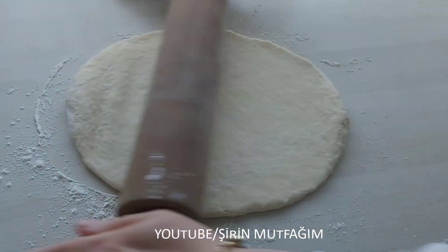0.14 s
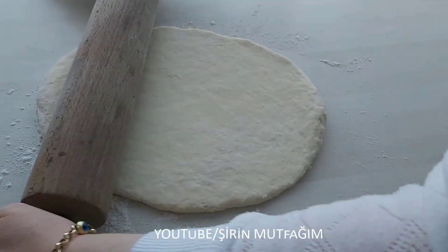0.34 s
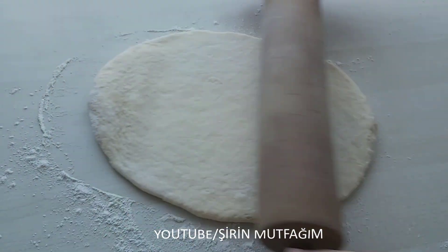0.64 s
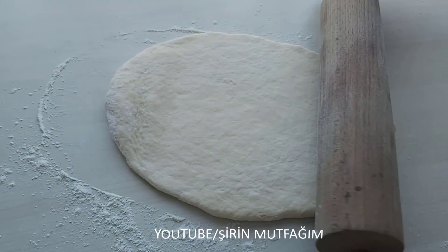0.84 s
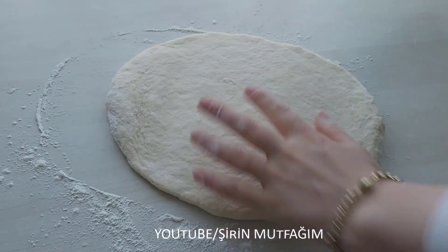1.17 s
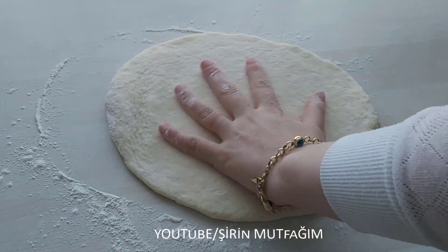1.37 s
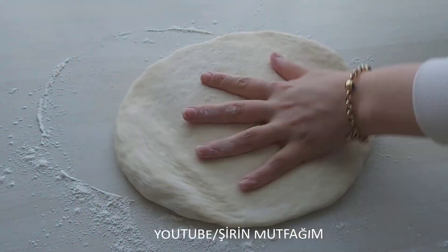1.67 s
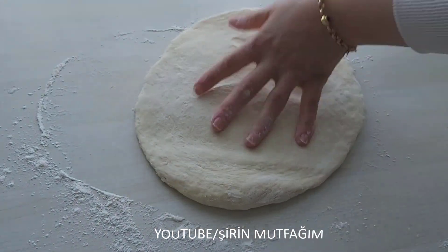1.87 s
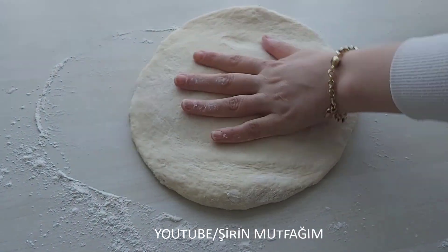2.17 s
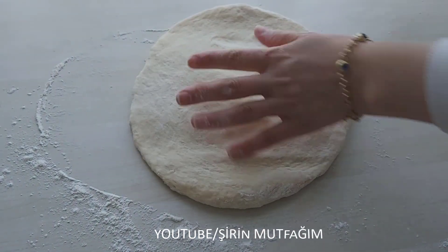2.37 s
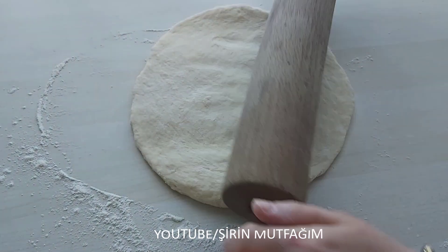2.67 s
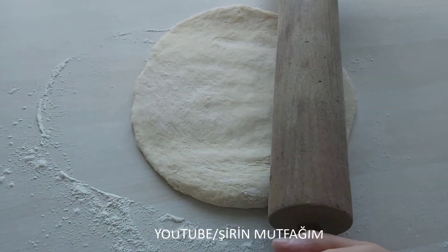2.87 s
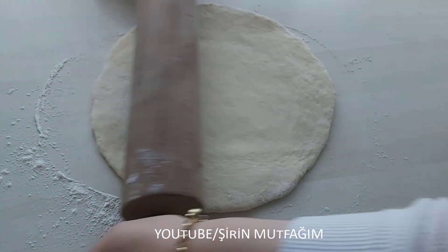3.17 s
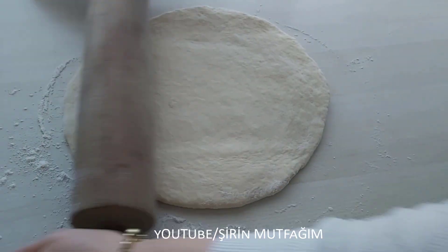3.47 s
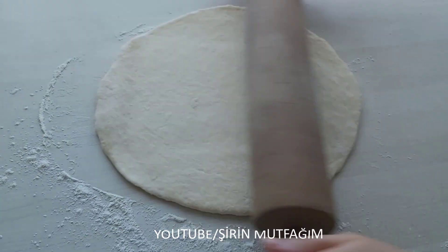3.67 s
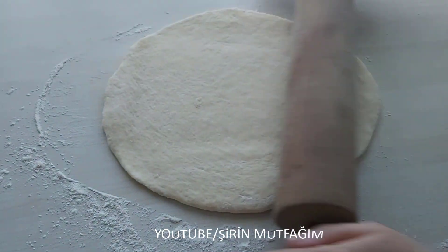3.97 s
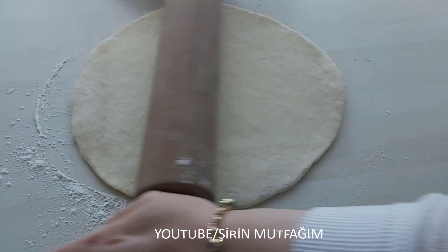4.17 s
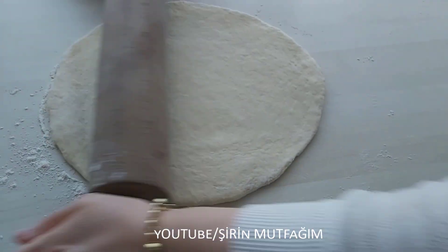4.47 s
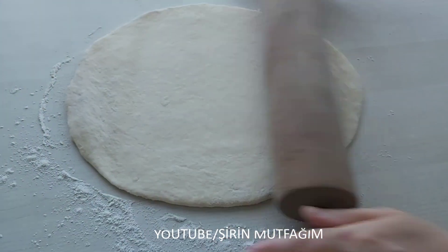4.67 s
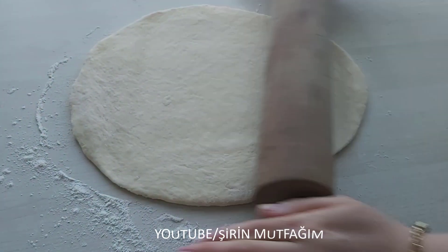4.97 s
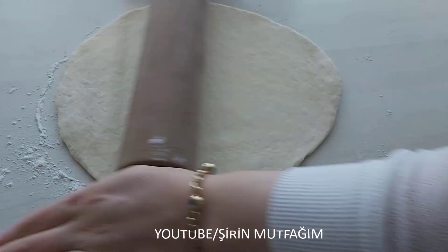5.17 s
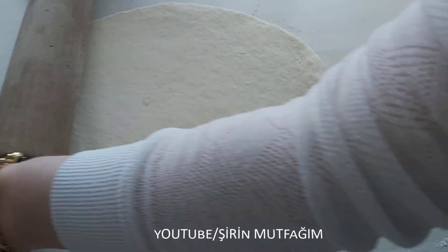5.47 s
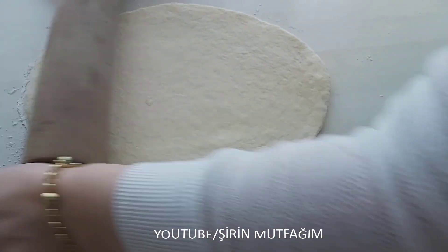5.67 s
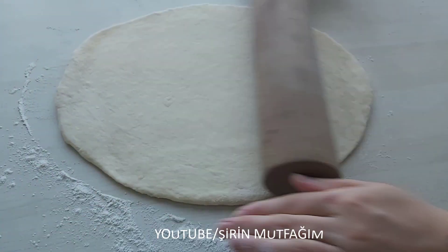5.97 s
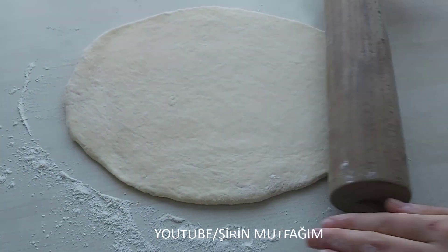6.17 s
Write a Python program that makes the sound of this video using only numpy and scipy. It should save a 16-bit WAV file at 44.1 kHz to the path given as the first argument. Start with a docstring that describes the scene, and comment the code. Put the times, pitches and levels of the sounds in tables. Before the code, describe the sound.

A wooden rolling pin rolls over floured dough in a ringing kitchen, rumbling, hissing and clicking, interrupted by hand pats and a swishing slide.

```python
"""A wooden rolling pin with loose handles works floured dough on a table in a bare, ringing kitchen.
Over a steady hum, the first strokes bring flour hiss, dough rasp, table rumble and axle rub: friction noise that
follows speed. Axle clicks, dull bumps, handle knocks, thumps and groans join them: blows and slips that excite
resonances. Then a hand pats the dough and slides it round with a swish. Rolling starts again with a thin squeak;
scuffs, knocks and the barrel's bumps over lumps of dough punctuate the later strokes."""
import sys
import numpy as np
from scipy import signal
from scipy.fft import rfft, irfft
from scipy.io import wavfile
from scipy.ndimage import uniform_filter1d

SR = 44100
rng = np.random.default_rng(int(sys.argv[2]) if len(sys.argv) > 2 else 0)


def waveform_to_disk(signal):
    """Save audio, clipped to [-1, 1], as 16-bit WAV at the path in sys.argv[1]."""
    frames = np.transpose(np.atleast_2d(signal))
    scaled = np.clip(frames, -1, 1) * 32767
    samples = np.round(scaled).astype(np.int16)
    wavfile.write(sys.argv[1], SR, samples)


N = 279285

# All source levels are relative: each layer's own gain is added to them.
# hum in the quiet of the kitchen: [f/Hz, width/Hz, lift/dB]; broad colour of the quiet: [f/Hz, density/dB]
HUM = [(70, 5.1, 5), (228, 10, 11), (239.8, 5.2, 29.5), (418, 27, 6)]
FLOOR_COLOUR = [(25, 12), (70, 12), (130, 8), (260, 6.5), (500, 2), (1200, -12.5), (5000, -23), (8000, -16),
                (11500, -15.5), (15000, -31)]
# strokes of the pin, out or back: [t/s, length/s, share of length at which it is fastest,
# flour hiss level/dB, dough rasp level/dB, table rumble level/dB, axle rub level/dB]
STROKES = [(-.03, 0.48, 0.28, -53.5, -56.5, -53, -64.5), (0.443, 0.4, 0.38, -52.5, -54, -58.5, -61.5),
           (0.833, .11, 0.64, -50, -62.5, -61, -60.5), (2.708, 0.27, 0.25, -60, -77, -64, -68),
           (2.997, 0.51, 0.06, -55.5, -60, -53, -64), (3.506, 0.38, 0.52, -50, -56, -49, -59),
           (3.931, 0.65, 0.14, -54.5, -59, -58.5, -64), (4.502, 0.35, 0.25, -51, -55, -48, -60),
           (4.88, 0.6, 0.41, -57.5, -66, -58, -64.5), (5.689, .51, 0.23, -51, -56.5, -52, -60.5),
           (6.224, 0.31, .3, -56.5, -87, -59.5, -71)]
# hand brushing or pushing the dough round on flour: [t/s, length/s, flour hiss level/dB, swish level/dB]
SLIDES = [(1.335, 0.051, -57, -88), (1.38, 0.57, -46, -48.5), (1.93, 0.01, -58, -62), (2.1, .22, -55, -60),
          (2.35, 0.061, -62.5, -79), (2.62, 0.044, -65, -90)]
# axle clicks, and a few dull bumps of the pin on the table:
# [t/s, level/dB, rebound rel. to it/dB, table thud rel. to it/dB]
CLICKS_AND_BUMPS = [(.168, -65.5, -3.5, 26), (.195, -45.5, -8, -2), (.895, -49.5, 2, -3),
                    (1.085, -49.5, 3, -1), (1.222, -103, -1, 22), (4.701, -45.5, -11, -2.5),
                    (4.735, -49, -12, 7.5), (6.037, -44.5, .8, -0.5)]
# a handle knocking against the barrel: [t/s, level/dB, rebound rel. to it/dB, table thud rel. to it/dB]
KNOCKS = [(.418, -45, 3, 6.5), (.450, -46, -12, 11.5), (3.300, -34, -2.5, 2), (4.295, -53, 7, 2.5),
          (4.394, -42, -0.5, 4.5), (5.460, -38, 0.1, 8.5), (5.569, -34, -3, 11.5), (5.606, -37.5, -4, 0)]
# hand or barrel landing on the table, or the barrel bumping over lumps of dough:
# [t/s, push level/dB, time of greatest push/s, slap rel. to push/dB, lowest modes rel. to push/dB]
THUMPS = [(.515, -21, 0.00082, 14, 2), (1.341, -1, 0.0029, -18.5, -4.5), (1.408, -12.5, 0.0011, -13, -8),
          (2.093, 5, 0.0039, -18.5, -22), (2.112, 6, 0.0019, -14, -0.5), (3.116, -4, 0.0026, -33, 3.5),
          (3.477, -14, 0.00073, 3, 4), (3.837, 6.5, 0.00047, 4.5, -12), (3.888, -30, 0.00078, 27, 25),
          (4.476, -32.5, 0.00034, 25.5, -3), (4.52, -32, 0.00051, 27, -9), (4.569, -14, 0.002, -12, 9),
          (5.065, -29, 0.00042, 19, 1), (5.579, -3, 0.00086, -26, 0.5)]
# the dry axle catching and groaning: [t/s, length/s, low ring level/dB, high ring level/dB]
GROANS = [(.84, .07, -60, -57), (.915, 0.015, -54, -74), (2.636, .03, -67, -64), (2.745, 0.21, -65, -79),
          (3.045, 0.074, -53.5, -54.5), (4.9, 0.13, -69, -72), (5.18, 0.045, -56, -61),
          (6.268, 0.049, -60, -65)]
# thin axle squeak as rolling starts again: [t/s, length/s, level/dB]
SQUEAK = [(2.82, 0.15, -62.5)]
# the barrel scuffing as it bites into the dough: [t/s, level/dB, table thud rel. to it/dB]
SCUFFS = [(3.065, -47.5, -33), (3.976, -39.5, 2.5)]

# low modes of table and kitchen: [f/Hz, level/dB, t60/s]
TABLE_MODES = [(46.5, -49, 0.48), (71.4, -46, 2.13), (85.2, -39.5, 0.5), (130.7, -27.5, 0.56),
               (144.4, -42, 0.26), (171.2, -40.5, 0.52), (209.8, -44.5, 0.99), (254, -39.5, 0.96),
               (285.4, -41, 0.45), (402, -39.5, 0.8), (542, -38, 0.45)]
# resonances of table top, pin, axle, and rubbed barrel (bright, hollow): [f/Hz, width/Hz, lift/dB]
BOARD = [(130.5, 8.6, 17), (209.7, 32, 11.5), (286, 40, 12), (399, 130, 6.5)]
PIN = [(822, 440, 7.5), (1747, 27, 10.5), (1980, 70, 2), (1940, 40, -1.5), (2285, 65, 12), (2540, 56, 11),
       (2876, 44, 17), (3150, 196, 15.5), (3350, 13, 10), (3790, 80, 12.5), (5040, 320, 5),
       (6210, 240, 8.5), (7700, 230, 8.5), (8280, 58, 16), (10000, 250, 12.5), (11500, 640, 2)]
SPINDLE = [(2390, 160, 11.5), (3160, 91, 10), (3610, 29, 14), (4610, 540, 6.5), (6770, 200, 0),
           (8630, 170, 6), (9600, 180, -12), (10100, 62, -39)]
BRIGHT = [(2340, 800, 20.5)]
HOLLOW = [(377, 220, 11.5), (1140, 390, 16)]

# broad spectral shapes of the rubbed and rolled layers: [f/Hz, density/dB]
HISS_COLOUR = [(500, -12), (2000, -11), (4000, 0.5), (6000, 0.5), (9000, -0.5), (12000, 1.5), (15500, -8)]
RASP_COLOUR = [(200, -20.5), (600, -2), (820, -1.5), (1200, -2), (1600, -3), (2400, -3.5), (4000, -7),
               (12000, -17.5)]
SWISH_COLOUR = [(100, -12.5), (260, -8.5), (480, -10.5), (650, -8.5), (800, -0.5), (1150, -2.5),
                (1550, -1.2), (2300, 1.5), (4000, -6), (12000, -12.5)]
ROLL_COLOUR = [(25, -18), (70, 1.5), (100, 0.5), (170, -0.5), (250, -6), (340, -5.5), (450, -5),
               (600, -18.5), (1200, -11.5), (5000, -52)]
AXLE_COLOUR = [(200, -16), (1200, -4.5), (2300, -5), (3300, -7), (5200, 0.5), (9000, 3.5), (15000, -38)]
HOLLOW_COLOUR = [(100, -47.5), (420, 9), (650, -25), (1150, -15.5), (1900, -9), (5000, -30)]
# broad spectral shapes of the struck layers: [f/Hz, density/dB]
CLICK_COLOUR = [(200, -13), (800, -19), (1350, -7.5), (2200, -8), (3800, -1.5), (5000, 0.5), (7000, 3),
                (11000, 3), (15000, -10.5)]
KNOCK_COLOUR = [(100, -54), (400, -8), (620, 0), (1300, 2), (2000, 9), (3100, 0.5), (4000, -4),
                (7000, -5.5), (12000, -7.5), (15000, -28)]
THUD_COLOUR = [(40, -10.5), (120, -11), (200, -17.5), (280, -3.5), (350, -7.5), (500, -4.5), (620, -11),
               (800, -9.5), (1500, -33.5), (6000, -54)]
THUMP_COLOUR = [(40, -40), (130, -2.5), (280, -4.5), (350, 0.5), (450, -8), (600, -10), (800, -8),
                (1300, -16), (2300, -23), (4000, -45), (12000, -39)]
SCUFF_COLOUR = [(200, -11), (1500, -5.5), (2500, 0), (3300, 1.5), (3900, 4.5), (5000, 2), (6500, -5),
                (9000, -5), (12000, -18), (15000, -53)]
# the groan's two rings, about an octave apart: [f/Hz, density/dB]
GROAN_LOW = [(600, -31), (1000, -11.5), (1150, -6), (1230, -1), (1340, -14.5), (1900, -21), (6000, -59)]
GROAN_HIGH = [(1000, -61), (2060, -16), (2240, 4), (2440, 0), (2640, -15), (4000, -47), (12000, -39)]

# kitchen reverberation: [f/Hz, t60/s]
KITCHEN = [(100, 0.67), (400, 0.56), (1500, 0.39), (4000, 0.33), (9000, 0.32), (15000, 0.3)]
# the two microphone ports: [f/Hz, side rel. to mid/dB] and [f/Hz, left minus right/dB]
WIDTH = [(60, -11.5), (130, -13), (300, -6.5), (600, -5), (1200, 0), (15000, 1.5)]
LEAN = [(60, -3), (130, -2), (300, -7.5), (700, -2), (2300, -3), (4400, -0.1), (9000, -2)]
TOP_HZ = 15650

# amplitude of each layer grows as this power of the speed
HISS_POWER, RASP_POWER, SWISH_POWER, AXLE_POWER, RUMBLE_POWER = 0.85, 0.93, 1.35, 0.5, 0.41
SLIDE_PEAK = 0.7  # share of a push at which the hand is fastest
GROAN_PEAK = 0.2  # share of a groan or squeak at which it is loudest
REBOUND_S = 0.019  # a strike is repeated by its rebound after this time
INERTIA_S = 0.033  # the weight of arm and pin rounds off every start and stop over this time


def undb(db):
    """Amplitude ratio of a level in decibels."""
    return 10 ** (np.asarray(db) / 20)


def by_pitch(points, hz):
    """Interpolation of a spectral table on a logarithmic frequency axis."""
    f, value = np.transpose(points)
    return np.interp(np.log(hz + 1), np.log(f), value)


def convolve(x, response):
    """Linear superposition of a response, cut to the length of x."""
    full = signal.fftconvolve(np.atleast_2d(x), np.atleast_2d(response), axes=-1)
    return full[:, :np.shape(x)[-1]]


def colour(x, points, peaks=()):
    """Minimum-phase filtering: a causal broad colour with resonances standing on it."""
    size = 8192
    hz = np.arange(size // 2 + 1) * SR / size
    db = by_pitch(points, hz)
    for f, width, lift in peaks:
        db = db + lift / (1 + (2 * (hz - f) / width) ** 2)
    # folding the cepstrum onto positive time makes the response causal
    cepstrum = irfft(np.log(undb(db)))
    cepstrum[1:size // 2] *= 2
    cepstrum[size // 2 + 1:] = 0
    return convolve(x, irfft(np.exp(rfft(cepstrum))))


def body(x, broad, peaks):
    """Forced resonance of a body, keeping the power of a white blow."""
    response = colour(signal.unit_impulse(SR), broad, peaks)
    return colour(x, broad, peaks) / np.linalg.norm(response)


def unit(x, size=N):
    """Normalisation to rms 1 over the first samples."""
    return x / np.sqrt(np.mean(x[..., :size] ** 2))


def diffuse(size):
    """Diffuse field: alike at both ports in the bass, nearly unrelated in the treble."""
    mid, side = rng.standard_normal((2, size))
    return mid + colour(side, WIDTH) * np.array([[1], [-1]])


def walk(rate):
    """Band-limited fluctuation: random values, rate per second, joined by straight lines."""
    steps = rng.standard_normal(N // 100)
    return np.interp(np.arange(N) / SR * rate, np.arange(len(steps)), steps)


def kitchen(direct_db):
    """Reverberation: a direct impulse, then dense reflections whose treble dies first."""
    hz, t, cells = signal.stft(diffuse(SR), SR, nperseg=256)
    # ln(1000) is a 60 dB fall in amplitude
    fade = np.exp(-np.log(1000) * t / by_pitch(KITCHEN, hz)[:, None])
    tail = signal.istft(cells * fade, SR)[1][:, :SR]
    tail /= np.sqrt(np.sum(tail ** 2) / 2)
    tail[:, 0] += undb(direct_db)
    return tail


def speed(start_s, length_s, fastest):
    """Kinematics from rest to rest: up to about 1 at a share of the length, then down."""
    turning_s = start_s + length_s * np.array([0, np.clip(fastest, 0.05, 0.95), 1])
    phase = np.interp(np.arange(N) / SR, turning_s, [0, np.pi / 2, np.pi])
    return np.maximum(uniform_filter1d(np.sin(phase), int(INERTIA_S * SR)), 0)


def strokes(power, column):
    """Power law of friction under the pin: each stroke's level times a power of its speed."""
    return sum(undb(row[column]) * speed(*row[:3]) ** power for row in STROKES)


def swells(rows, fastest, power, column):
    """Power law of friction for movements that share one shape."""
    return sum(undb(row[column]) * speed(*row[:2], fastest) ** power for row in rows)


def friction(drive, broad, peaks, grain_db, flutter_db, flutter_rate):
    """Stochastic friction: tiny slips of uneven size, coloured by the rubbed body and smeared by the room."""
    grain = np.minimum(rng.exponential(size=N), 5)
    slips = rng.standard_normal(N) * undb(grain * grain_db)
    slips *= undb(flutter_db * walk(flutter_rate))
    response = colour(kitchen(direct_db=-6.5), broad, peaks)
    return convolve(drive * unit(slips), response / np.sqrt(np.sum(response ** 2) / 2))


def contact(db, direct_db):
    """Impulse response of the room to one blow; the pin moves, so the reflections are new each time."""
    return undb(db) * unit(kitchen(direct_db), size=1300)


def add(track, s, sound):
    """Superposition of a sound on a track from a given time."""
    part = track[:, int(s * SR):][:, :sound.shape[1]]
    part += sound[:, :part.shape[1]]


def rebounding(rows):
    """Repeated impact: each strike and its rebound, as [t/s, level/dB, thud/dB]."""
    hits = []
    for s, db, again, thud in rows:
        hits += [(s, db, thud), (s + REBOUND_S, db + again, thud)]
    return hits


def rattle(hits, broad, peaks, direct_db, thud_db, chatter_db, chatter_s):
    """Impact excitation: contacts chatter and ring a body, passing a thud to the table."""
    blows, pushes = np.zeros((2, 2, N))
    age = np.arange(SR // 20) / SR
    for s, db, thud in hits:
        chatter = rng.standard_normal(len(age)) * np.exp(-age / chatter_s)
        # a sharp first touch, then the chatter
        blow = undb(chatter_db) * chatter / np.linalg.norm(chatter) + (age == 0)
        echoes = contact(db, direct_db)
        add(blows, s, convolve(echoes, blow / np.linalg.norm(blow)))
        add(pushes, s, undb(thud + thud_db) * echoes)
    return body(blows, broad, peaks) + body(pushes, THUD_COLOUR, BOARD)


def quiet():
    """Stationary diffuse noise with narrow resonances: the hum of the kitchen."""
    return undb(-65) * unit(colour(diffuse(N), FLOOR_COLOUR, HUM))


def flour(hiss_db, rasp_db, swish_db):
    """Granular friction and shear: flour hisses, dough rasps under the pin and swishes as it slides."""
    rubbed = strokes(HISS_POWER, column=3) + swells(SLIDES, SLIDE_PEAK, HISS_POWER, column=2)
    hiss = friction(rubbed, HISS_COLOUR, (), grain_db=4.5, flutter_db=2.5, flutter_rate=41)
    sheared = strokes(RASP_POWER, column=4)
    rasp = friction(sheared, RASP_COLOUR, (), grain_db=3.5, flutter_db=3.5, flutter_rate=40)
    slid = swells(SLIDES, SLIDE_PEAK, SWISH_POWER, column=3)
    swish = friction(slid, SWISH_COLOUR, (), grain_db=1.5, flutter_db=1.0, flutter_rate=51)
    return undb(hiss_db) * hiss + undb(rasp_db) * rasp + undb(swish_db) * swish


def rolling(rumble_db, bright_db, hollow_db):
    """Rolling contact: bumps make the table resonate in a rumble while the axle rubs in the barrel."""
    bumps = diffuse(N) * strokes(RUMBLE_POWER, column=5) * undb(3.1 * walk(30))
    rumble = body(bumps, ROLL_COLOUR, BOARD)
    rub = strokes(AXLE_POWER, column=6)
    bright = friction(rub, AXLE_COLOUR, BRIGHT, grain_db=4.0, flutter_db=3.5, flutter_rate=16)
    hollow = friction(rub, HOLLOW_COLOUR, HOLLOW, grain_db=7.0, flutter_db=2.5, flutter_rate=22)
    return undb(rumble_db) * rumble + undb(bright_db) * bright + undb(hollow_db) * hollow


def clicks_and_bumps():
    """Impact with short chatter: the axle rings in clicks; in dull bumps the table's thud prevails."""
    return rattle(rebounding(CLICKS_AND_BUMPS), CLICK_COLOUR, SPINDLE,
                  direct_db=-11, thud_db=-6, chatter_db=1, chatter_s=0.0023)


def knocks():
    """Impact and rebound: a loose handle strikes the barrel and rings the pin's resonances."""
    return rattle(rebounding(KNOCKS), KNOCK_COLOUR, PIN,
                  direct_db=-24.0, thud_db=-9.5, chatter_db=-4, chatter_s=0.0072)


def thumps(slap_db, direct_db):
    """Modal excitation: landings, and bumps over lumps of dough, slap and shake the table's modes."""
    t = np.arange(2 * SR) / SR
    modes = []
    for k, (hz, db, t60) in enumerate(TABLE_MODES):
        # neighbouring modes swing in opposite directions, so the boom takes a moment to build
        swing = (-1) ** k * np.sin(2 * np.pi * hz * t)
        modes.append(undb(db) * swing * np.exp(-np.log(1000) * t / t60))
    modes = np.array(modes)
    lowest = np.array(TABLE_MODES)[:, 0] < 100
    slaps, booms = np.zeros((2, 2, N))
    for s, db, contact_s, slap_rel, low_rel in THUMPS:
        # a longer push favours the lower modes
        age = t[:SR // 20] / contact_s
        push = age * np.exp(-age)
        boom = convolve(undb(low_rel * lowest) @ modes, push / push.sum())
        add(booms, s, undb(db) * boom)
        # a long, soft contact meets the table gradually, a short, hard one almost at once
        rise = np.minimum((t[:SR] + 0.00075) / (5 * contact_s), 1)
        add(slaps, s, rise * contact(db + slap_rel + slap_db, direct_db))
    return booms + body(slaps, THUMP_COLOUR, BOARD)


def groans(groan_db):
    """Frictional resonance: where the axle catches, its slips gather in two narrow rings."""
    low_drive = swells(GROANS, GROAN_PEAK, AXLE_POWER, column=2)
    low = friction(low_drive, GROAN_LOW, (), grain_db=6.0, flutter_db=2.0, flutter_rate=25)
    high_drive = swells(GROANS, GROAN_PEAK, AXLE_POWER, column=3)
    high = friction(high_drive, GROAN_HIGH, (), grain_db=6.5, flutter_db=1.0, flutter_rate=8.7)
    return undb(groan_db) * (low + high)


def squeak(hz, width_hz, lift_db):
    """Frictional resonance: quick slips of the axle excite one high resonance."""
    drive = swells(SQUEAK, GROAN_PEAK, AXLE_POWER, column=2)
    return friction(drive, AXLE_COLOUR, [(hz, width_hz, lift_db)],
                    grain_db=4, flutter_db=2.0, flutter_rate=38)


def scuffs():
    """Impact with long chatter: the barrel bites into the dough, without resonances of its own."""
    return rattle(SCUFFS, SCUFF_COLOUR, (), direct_db=-26, thud_db=-5.5, chatter_db=1.5, chatter_s=0.043)


def scene():
    """Superposition of all sources over the quiet of the kitchen."""
    rubbing = flour(hiss_db=-1.65, rasp_db=4.5, swish_db=3.5)
    rubbing = rubbing + rolling(rumble_db=-2.9, bright_db=3.2, hollow_db=-2.5)
    impacts = clicks_and_bumps() + knocks() + thumps(slap_db=-37, direct_db=0) + scuffs()
    axle_cries = groans(groan_db=0.3) + squeak(hz=5460, width_hz=1300, lift_db=14.5)
    return quiet() + rubbing + impacts + axle_cries


def record(dry):
    """Band-limited reception: the right port hears a little more; the deepest bass and the top are cut."""
    ports = []
    for x, sign in zip(dry, (1, -1)):
        ports.append(colour(x, [(hz, sign * db / 2) for hz, db in LEAN]))
    bass_cut = signal.butter(4, 39, "highpass", fs=SR, output="sos")
    top_cut = signal.ellip(10, 0.2, 80, TOP_HZ, fs=SR, output="sos")
    return signal.sosfilt(top_cut, signal.sosfilt(bass_cut, np.vstack(ports)))


dry = scene()
out = record(dry)
waveform_to_disk(out)
```